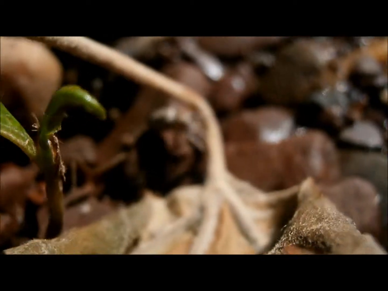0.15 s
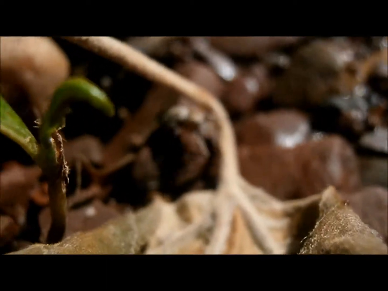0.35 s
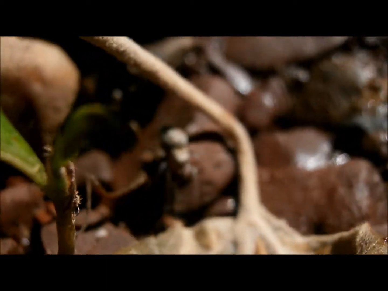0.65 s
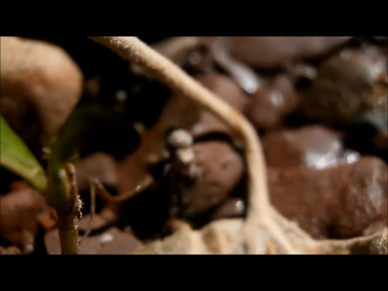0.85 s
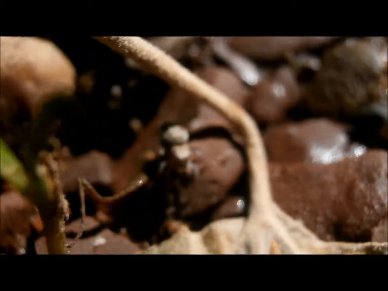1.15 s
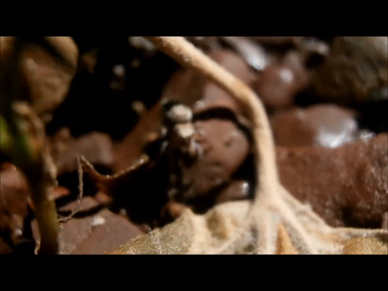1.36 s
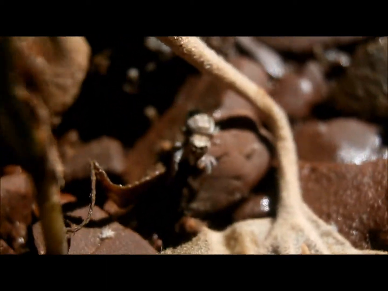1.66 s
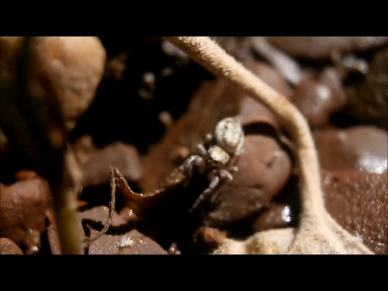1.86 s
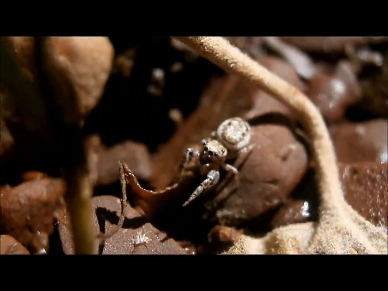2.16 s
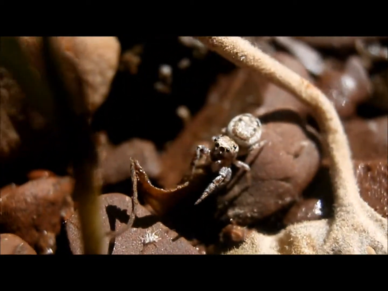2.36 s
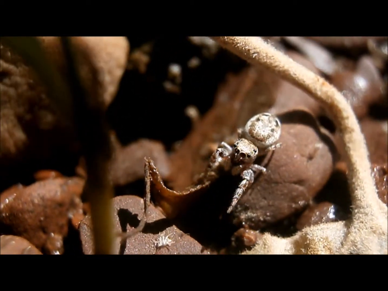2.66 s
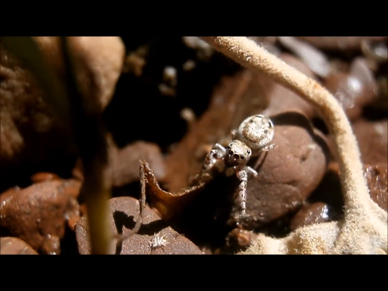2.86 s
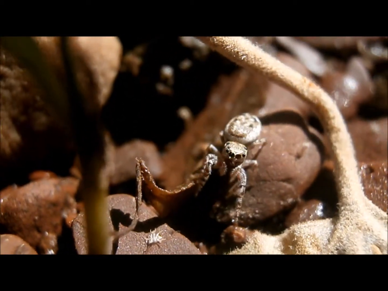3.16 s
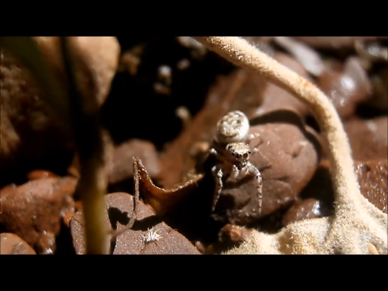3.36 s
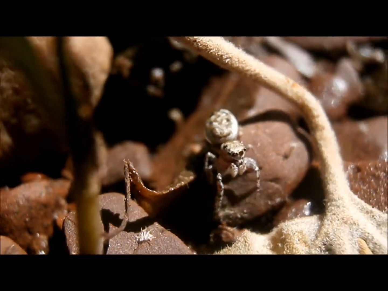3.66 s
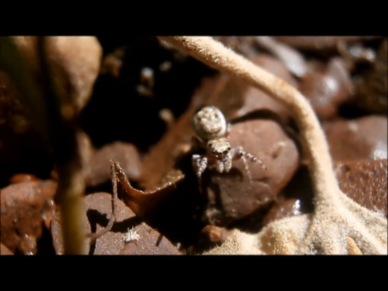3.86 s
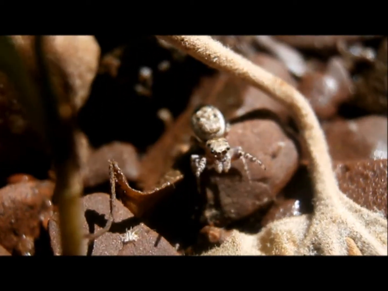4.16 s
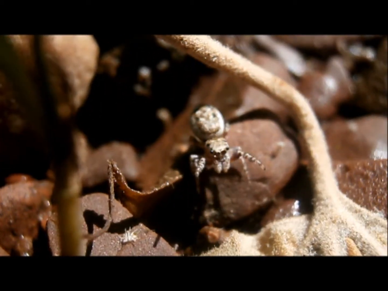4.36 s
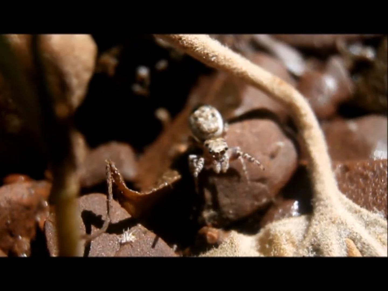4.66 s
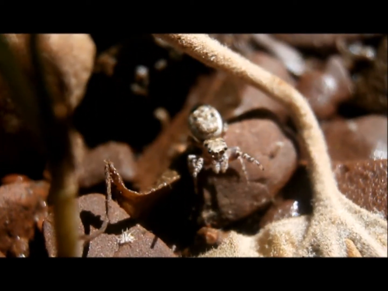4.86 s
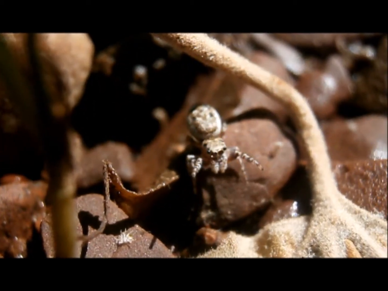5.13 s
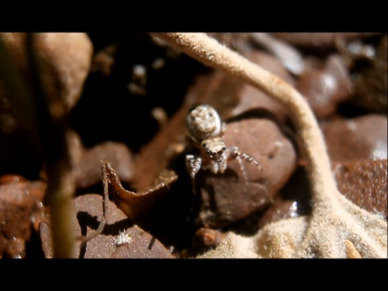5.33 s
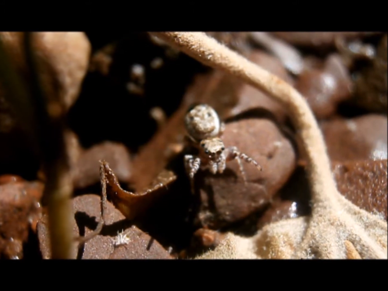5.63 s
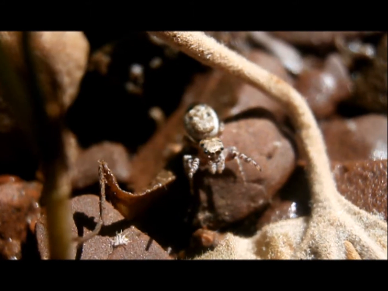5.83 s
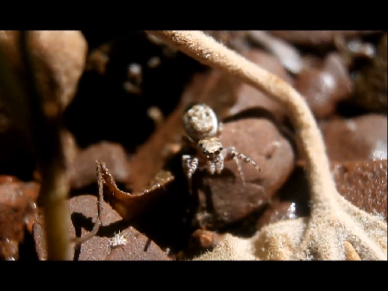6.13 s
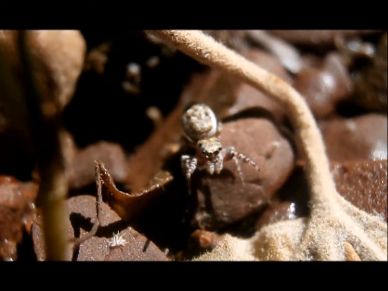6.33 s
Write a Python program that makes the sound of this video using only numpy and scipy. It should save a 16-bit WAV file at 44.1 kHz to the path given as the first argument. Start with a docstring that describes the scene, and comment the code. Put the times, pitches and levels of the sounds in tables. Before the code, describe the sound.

Close water trickle and crackling litter stop dead at four seconds; clear rising bird whistles continue, then soft pips and a faint distant rattle.

```python
"""A bird's rising whistle repeats outdoors near the microphone, others answer the ear from farther off.
Whistles are gliding tones with echoes; the low distant rumble beneath them is shaped noise.
For four seconds water trickles (ringing bubbles, noise) and dry leaves and grit crackle (struck resonances)
close to the microphone, under a thin electronic whine (a dipping sine). An edit cuts these off.
The birds go on with runs of soft pips, and a faint fast rattle of ringing clicks joins near the end."""
import sys
import numpy as np
from scipy import signal
from scipy.fft import rfft, irfft
from scipy.io import wavfile
from scipy.ndimage import map_coordinates

SR = 44100
rng = np.random.default_rng(int(sys.argv[2]) if len(sys.argv) > 2 else 0)


def unload_audio(sound):
    """Save the sound as a 16-bit wav file, at the path given as the first command line argument."""
    columns = np.transpose(np.atleast_2d(sound))
    # keep every value between -1 and 1, then stretch to whole-number steps
    steps = np.round(np.clip(columns, -1, 1) * 32767)
    wavfile.write(sys.argv[1], SR, steps.astype(np.int16))


N = 286209
TIME = np.arange(N) / SR  # s
CUT_S = 3.982  # the edit that ends the close sounds

# what the dry litter rings with, low register to high: [f/Hz, width/Hz, level/dB]
KNOCK = [(565, 650, 2.5), (1310, 690, 4.5), (2300, 750, 5)]
CLACK = [(4100, 770, 0)]
SNAP = [(6584, 640, 4.5), (7030, 260, 2), (8460, 700, 0.5), (10300, 1020, -7.5), (12970, 1500, -12)]
# how strongly the fine litter is stirred: [t/s, relative level/dB]
RUSTLE = [(0, -61), (.11, -49.5), (.2, -58.5), (.78, -57.5), (1.1, -49.5), (1.3, -51), (1.76, -48),
          (1.95, -56), (2.04, -40.5), (2.32, -48.5), (2.52, -47), (2.6, -36.5), (2.7, -55), (2.9, -65),
          (3.44, -58), (3.56, -65), (3.8, -47), (3.97, -49)]


def gain_of(db):
    """Decibels to an amplitude factor."""
    return 10 ** (np.asarray(db) / 20)


def evened(x):
    """Scales to rms 1."""
    return x / np.sqrt(np.mean(x ** 2) + 1e-20)


def curve(rows):
    """A table of [t/s, value] drawn as straight lines through every sample."""
    return np.interp(TIME, *np.transpose(rows))


def add(mix, s, sound):
    """Mixes a sound in at s seconds, in place."""
    part = mix[max(round(s * SR), 0):][:len(sound)]
    part += sound[:len(part)]


def coloured(x, points):
    """Filters x by a curve of [f/Hz, dB], straight over log frequency, and sets it to rms 1."""
    f, db = np.transpose(points)
    hz = np.fft.rfftfreq(len(x), 1 / SR)
    response = gain_of(np.interp(np.log(hz + 1), np.log(f + 1), db))
    return evened(irfft(rfft(x) * response, len(x)))


def wander(size, hz):
    """Smooth chance: a curve through about hz random knots a second."""
    knots = rng.standard_normal(int(size / SR * hz) + 4)
    return map_coordinates(knots, [np.arange(size) * hz / SR], order=3, mode="nearest")


def ring(x, modes):
    """Parallel resonances, each applied twice for steep skirts."""
    out = 0
    for hz, width, db in modes:
        # each pass is wider, so that the two together come out near the stated width
        b, a = signal.iirpeak(min(hz, SR / 2.2), hz / (1.5 * width), SR)
        once = signal.lfilter(b, a, x)
        out = out + gain_of(db) * signal.lfilter(b, a, once)
    return out


def whistle(length, start_hz, rise_hz, swell_db, edge_db, bend=0.316, sag_hz=55, flutter_db=0.7,
            jitter=0.0039, attack=0.003, release=0.025, scoop_hz=260, scoop_s=0.0013, dull_db=-9):
    """One nearly pure note that snaps up to pitch, climbs, then levels off, dulls and falters as it is let go."""
    # partials; the throat favours the second: [multiple of the strong line, level/dB]
    partials = [(.5, -44), (1, 0), (1.5, -32), (2, -35), (2.5, -50)]
    t = np.arange(int(length * SR)) / SR
    u = t / length
    fade = np.minimum((length - t) / release, 1)
    scoop = np.exp(-t / scoop_s)

    climb = rise_hz * (u + bend * u * (1 - u))
    unsteady = jitter * (1 + 5 * (1 - fade) + 12 * scoop) * wander(len(t), 390)
    hz = (start_hz + climb - sag_hz * (1 - fade) - scoop_hz * scoop) * (1 + unsteady)
    phase = 2 * np.pi * np.cumsum(hz) / SR

    tone = 0
    for k, db in partials:
        lift_db = (edge_db + dull_db * u ** 3) * (k > 1)  # only overtones are lifted and dulled
        tone = tone + gain_of(db + lift_db) * np.sin(k * phase)
    shape = np.minimum(t / attack, 1) * np.sqrt(fade)
    level_db = swell_db * (u - .5) + flutter_db * wander(len(t), 84)
    return np.sqrt(2) * tone * shape * gain_of(level_db)


def outdoors(x, t60=0.7, delay=0.0067, early=0.99, early_t60=0.12):
    """Echoes: a quick cluster from the ground, then a thin tail from the trees; times in s."""
    t = np.arange(SR) / SR
    fall = gain_of(-60 * t / t60) + early * gain_of(-60 * t / early_t60)
    sparse = rng.standard_normal(SR) * (rng.random(SR) < .05)
    taps = sparse * (t > delay) * fall
    return signal.fftconvolve(x, taps / np.linalg.norm(taps))[:N]


def birds(near_hz=2661, near_rise_hz=318.4, far_rise_hz_per_s=1400,
          near_wet_db=-16, far_wet_db=-9, far_swell_db=-2, pip_s=0.0019):
    """Near and far whistles and far pips; the farther the bird, the more of its sound arrives as echo."""
    # near whistles: [t/s, length/s, level/dB, swell towards the end/dB, lift of the overtones/dB]
    near_calls = [(0.23, 0.13, -41, -1, 10), (1.558, 0.14, -38, -2.5, 7), (2.681, 0.14, -36, 1, 5),
                  (3.736, 0.13, -33, 5.5, 4), (4.939, 0.14, -33.5, 4, 5), (6.091, 0.15, -43.5, -4.5, 11)]
    # far whistles: [t/s, length/s, starting f/Hz, level/dB]
    far_calls = [(0, .11, 2860, -50.5), (0.458, 0.12, 2855, -41.5), (1.328, 0.092, 2830, -56),
                 (3.133, 0.12, 2860, -53), (3.989, 0.18, 2740, -77), (4.295, 0.14, 2800, -68),
                 (4.533, 0.0797, 2760, -68), (4.594, .125, 2840, -57.5), (5.357, 0.092, 2590, -62),
                 (5.745, 0.086, 2885, -53.5)]
    # runs of short soft pips: [t of first pip/s, length of the run/s, pip to pip/s, f/Hz, level/dB]
    pip_runs = [(5.549, .52, 0.054, 2700, -55), (6.216, .23, .066, 2900, -45.5)]
    near, far = np.zeros((2, N))
    for s, length, db, swell_db, edge_db in near_calls:
        add(near, s, gain_of(db) * whistle(length, near_hz, near_rise_hz, swell_db, edge_db))
    for s, length, start_hz, db in far_calls:
        note = whistle(length, start_hz, far_rise_hz_per_s * length, far_swell_db, 0, attack=0.0044)
        add(far, s, gain_of(db) * note)

    t = TIME[:SR // 20]
    pip_shape = t / pip_s * np.exp(1 - t / pip_s)  # peaks at 1 after pip_s
    for first, length, gap, hz, db in pip_runs:
        for s in np.arange(first, first + length, gap):
            add(far, s, gain_of(db) * pip_shape * np.sin(2 * np.pi * hz * t))
    echoes = outdoors(gain_of(near_wet_db) * near + gain_of(far_wet_db) * far)
    return near + far + echoes


def air(air_db=-44.5):
    """Distant rumble: noise in a few broad humps, swelling slowly, with a faint hiss."""
    # spectrum of the distance: [f/Hz, relative level per Hz/dB]
    rumble = [(20, -31), (55, -16.5), (85, -3.5), (125, -12.5), (235, 1), (300, -3), (410, -14), (540, -8),
              (710, -15), (800, -13.5), (1100, -22), (1600, -32.5), (2300, -35.5), (15000, -41)]
    # slow swell: [t/s, change of level/dB]
    swell = [(4.1, -2), (4.9, 0), (5.5, -1.5), (6.4, -0.5)]
    return gain_of(air_db + curve(swell)) * coloured(rng.standard_normal(N), rumble)


def bubble(hz, cycles=9, glide=0.04):
    """A bubble rings briefly, rising in pitch as it nears the surface; its change of volume is what sounds."""
    u = np.arange(int(5 * cycles / hz * SR)) / SR * hz / cycles
    pulsing = np.sin(2 * np.pi * cycles * (u + glide * u ** 2 / 2))
    volume = pulsing * np.exp(-u) * (1 - np.exp(-8 * u))
    return np.gradient(volume) * SR / (2 * np.pi * hz)


def water(wash_db=0, bubbles_db=-2, per_s=16, spread_db=6.0, flicker_db=3.0, low_hz=480, high_hz=1400,
          hiss_db=-55, count=30):
    """A trickle close by: swarms of small bubbles, a few larger bubbles, drips and low thuds, a splashing wash
    and an even hiss."""
    # flow of the water: [t/s, level/dB]
    flow = [(0.0, -45), (1.03, -41.5), (2.62, -40), (2.86, -43.5), (3.81, -41.5), (3.9, -42)]
    # spectrum of the splashing wash: [f/Hz, relative level per Hz/dB]
    wash_colour = [(40, -13), (200, -3.5), (350, 0.5), (520, -7), (760, -0.5), (1200, -4.5), (1700, -11),
                   (2100, -10.5), (2600, -7.5), (3400, -15), (4100, -18.5), (5400, -27), (9000, -55)]
    # single ringing sounds: larger bubbles, drips at .15 and .204 s, and low thuds of the cracks at .812, 1.487
    # and 1.893 s: [t/s, f/Hz, level/dB]
    single_rings = [(.15, 2640, -32.5), (.204, 2980, -28.5), (.28, 658, -27), (.42, 817, -28.5),
                    (.545, 1187, -26), (.812, 658, -29.5), (1.06, 903, -27), (1.487, 904, -27),
                    (1.893, 538, -28.5), (2.33, 707, -26.5), (3.44, 1080, -27), (3.933, 694, -25)]
    # spectrum of the even hiss: [f/Hz, relative level per Hz/dB]
    hiss_colour = [(2000, -22), (4000, 5.5), (5400, -1.5), (6600, 7), (9000, 0.5), (14000, -2.5)]
    swarm = np.zeros(N)
    for hz in np.geomspace(low_hz, high_hz, count):
        sizes = gain_of(spread_db * np.minimum(rng.exponential(1, N), 3))
        births = (rng.random(N) < per_s / SR) * sizes  # per_s bubbles a second at each pitch
        swarm += signal.oaconvolve(births, bubble(hz, cycles=5.36))[:N]
    flicker = gain_of(flicker_db * wander(N, 160))
    wash = coloured(rng.standard_normal(N), wash_colour) * flicker
    out = gain_of(curve(flow)) * (gain_of(wash_db) * wash + gain_of(bubbles_db) * evened(swarm))
    for s, hz, db in single_rings:
        add(out, s, gain_of(db) * bubble(hz))
    return out + gain_of(hiss_db) * coloured(rng.standard_normal(N), hiss_colour)


def electronics(whine_hz=14947, whine_db=-50, buzz_hz=57, dip=.8, dip_s=0.001, hum_hz=78, hum_db=-56,
                low_db=-49, stir=0.17):
    """A whine that dips briefly at a buzzing rate, a wavering hum, and a dull rumble that swells with the litter."""
    from_dip = (TIME * buzz_hz % 1 - .5) / buzz_hz  # s from the nearest dip
    buzz = 1 - dip * np.exp(-(from_dip / dip_s) ** 2)
    whine = gain_of(whine_db) * buzz * np.sqrt(2) * np.sin(2 * np.pi * whine_hz * TIME)
    hum = gain_of(hum_db) * evened(ring(rng.standard_normal(N), [(hum_hz, 14, 0)]))
    # [f/Hz, relative level per Hz/dB]
    dull = [(20, -34), (50, -29), (110, -0.5), (200, 1), (400, -7), (700, -46), (3000, -79)]
    low = coloured(rng.standard_normal(N), dull)
    stirred_db = curve(RUSTLE) - np.median(curve(RUSTLE))
    return whine + hum + gain_of(low_db + stir * stirred_db) * low


def crackle(per_s=130, spread_db=4.5, snap_db=-1, clack_db=-8, knock_db=-6, variety=0.19, clump_db=3.0,
            clumps_per_s=45, level_db=-1.0, count=6):
    """Countless small ticks from bits of several sizes, which come in clumps and grow as the litter is stirred."""
    out = 0
    for pitch in 1 + variety * np.linspace(-.6, 1, count):
        strength = gain_of(spread_db * np.minimum(rng.exponential(1, N), 3.5))
        hits = strength * (rng.random(N) < per_s / SR)  # per_s hits a second for each size of bit
        for db, modes in ((knock_db, KNOCK), (clack_db, CLACK), (snap_db, SNAP)):
            bit = [(hz * pitch, width, level) for hz, width, level in modes]
            out = out + gain_of(db) * evened(ring(hits * rng.standard_normal(N), bit))
    stirring_db = curve(RUSTLE) + level_db + clump_db * wander(N, clumps_per_s)
    return gain_of(stirring_db) * out / np.sqrt(count)


def slips(uneven=0.2, spread_db=4.5, decay=0.00064):
    """A dry leaf sticks and slips under strain at an uneven pace; each slip is one bright tick."""
    # creaks, each a run of slips: [t/s, length/s, typical peak level/dB, slips per second]
    creaks = [(.738, .06, -32.5, 57), (0.849, .037, -23, 124), (.9215, .056, -32, 130),
              (1.103, .02, -31, 84), (1.847, .035, -23, 39)]
    out, t = np.zeros(N), TIME[:SR // 100]
    for start, length, db, per_s in creaks:
        for s in np.arange(start, start + length, 1 / per_s):
            late, size = rng.standard_normal(2)
            scrape = 0.32 * np.exp(-t / decay) * rng.standard_normal(len(t))
            tick = ring((t == 0) + scrape, SNAP)
            level = gain_of(db + spread_db * size)
            add(out, s + uneven * late / per_s, level * tick / abs(tick).max())
    return out


def cracks(hard_db=-22, hard_clack_db=-.5, clack_growth=0.37, tail_db=-35, tail_t60=0.1, grit_db=-11,
           level_db=0.0, linger=(2.2, 1.4, 1), count=4):
    """A few fractures within milliseconds ring the litter; low registers linger, then the bits settle."""
    # the loudest cracks of dry leaf and grit:
    # [t/s, length/s, strength/dB, brightness/dB (snap up and knock down)]
    loud_cracks = [(0.813, .002, -34, -4.5), (0.9564, 0.0021, -21, 1), (.9887, .001, -31, 7.5),
                   (1.0411, .002, -22.5, 1), (1.4095, 0.0015, -32, 0), (1.486, 0.00092, -40.5, -1.5),
                   (1.607, 0.00095, -35.5, 4.5), (1.7802, .0007, -24.5, 6), (1.8925, 0.0014, -33, -5),
                   (2.0095, 0.0019, -29.5, 3.5), (2.02, 0.0054, -31.5, -2), (2.0326, .0022, -29, 4.5),
                   (2.095, 0.003, -27.5, 2.5), (2.1213, 0.00148, -29, 3.5), (2.2746, .0012, -29.5, -7.5),
                   (2.3697, 0.0018, -30.5, -3), (2.4215, 0.0032, -33, -3.5), (2.4694, .001, -36, -0.5),
                   (2.5394, 0.00094, -23.5, 2), (2.5812, 0.00095, -22.5, .5), (3.471, .003, -32, -2),
                   (3.6856, 0.0015, -38.5, .5), (3.776, 0.0031, -31, 3.5), (3.9386, .0022, -35, 1.5)]
    out, t = np.zeros(N), TIME[:SR // 20]
    for s, length, strength_db, bright_db in loud_cracks:
        # the clack loses clack_growth dB for each dB that a crack is weaker than a hard one
        clack_db = hard_clack_db + clack_growth * (strength_db - hard_db)
        levels = strength_db + np.array([-bright_db, clack_db, bright_db])
        fractures = np.zeros(len(t))
        at = (np.arange(count) + .7 * rng.random(count)) / count * length
        fractures[(at * SR).astype(int)] = rng.choice([-1, 1], count) * rng.uniform(1, 1.03, count)
        settling = gain_of(tail_db - 60 * t / tail_t60)
        for db, modes, stretch in zip(levels, (KNOCK, CLACK, SNAP), linger):
            grit = gain_of(grit_db) * np.exp(-(t / (length * stretch)) ** 2) + settling
            sound = ring(fractures + grit * rng.standard_normal(len(t)), modes)
            # equal energy: the level is the rms it would have if packed into 5 ms
            packed = sound * np.sqrt(.005 * SR) / np.linalg.norm(sound)
            add(out, s, gain_of(db + level_db) * packed)
    return out


def rattle(start_s=5.7525, per_s=32, level_db=-59, fade_db=-11, fade_s=0.67, body_db=-50, echo_db=-7):
    """Quick dry taps far off, blurred by steady ringing noise as their echoes, over a low hollow rumble."""
    # resonance of a tap: [f/Hz, width/Hz, level/dB]
    tap_modes = [(1430, 330, 0)]
    # resonances of its echo: [f/Hz, width/Hz, level/dB]
    echo_modes = [(1430, 300, 0), (1130, 200, -3)]
    first = round(start_s * SR) - SR // 200  # 5 ms ahead of the first tap
    clicks = np.zeros(N)
    clicks[(np.arange(start_s, TIME[-1], 1 / per_s) * SR).astype(int)] = 1
    taps = evened(ring(clicks, tap_modes)[first:])
    echo = evened(ring(rng.standard_normal(N), echo_modes)[first:])
    # [f/Hz, relative level per Hz/dB]
    hollow = [(20, -38), (60, -8), (180, -9), (260, -9.5), (370, 2.5), (460, -18), (1500, -58)]
    body = coloured(rng.standard_normal(N), hollow)
    # the taps fade ever faster, by fade_db in fade_s
    fade = gain_of(level_db + fade_db * (TIME[:N - first] / fade_s) ** 2)
    return np.pad(fade * (taps + gain_of(echo_db) * echo) + gain_of(body_db) * body[first:], (first, 0))


def scene():
    """The close sounds stop at the edit; birds and air run through, and the rattle comes late."""
    close = (water() + electronics() + crackle() + slips() + cracks()) * (TIME < CUT_S)
    return (birds() + air() + close + rattle())[None]


def record(dry, ceiling=.56, edge_hz=15900):
    """The microphone input rounds off peaks that near its ceiling; then a low-pass limits the band."""
    rounded = dry / (1 + (dry / ceiling) ** 6) ** (1 / 6)
    low_pass = signal.firwin(511, edge_hz, window=("kaiser", 9), fs=SR)
    return signal.oaconvolve(rounded, low_pass[None], "same")


dry = scene()
out = record(dry)
unload_audio(out)
```